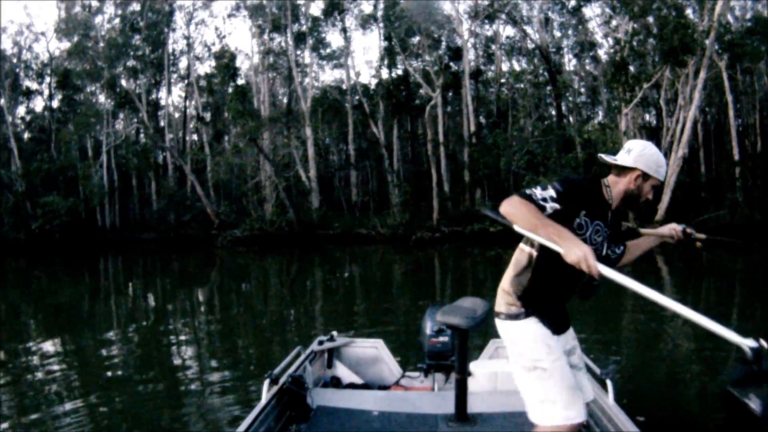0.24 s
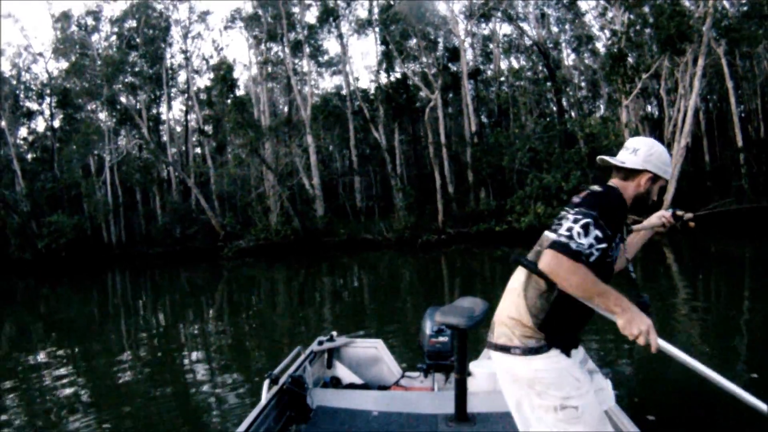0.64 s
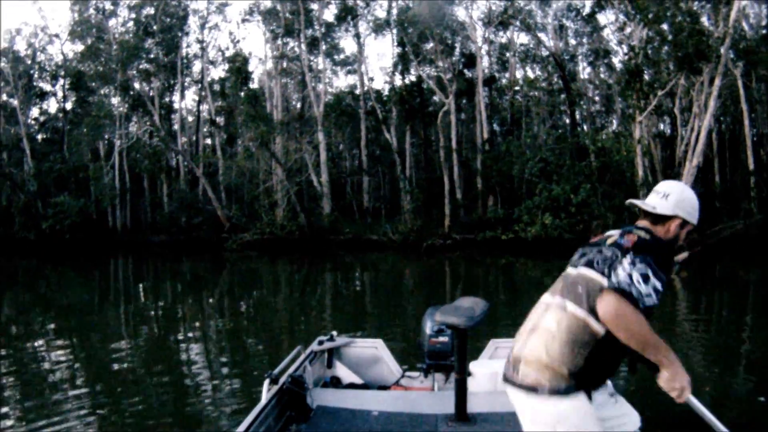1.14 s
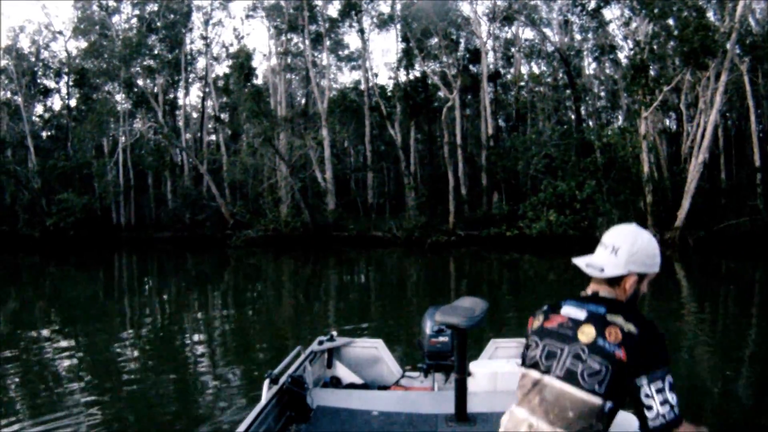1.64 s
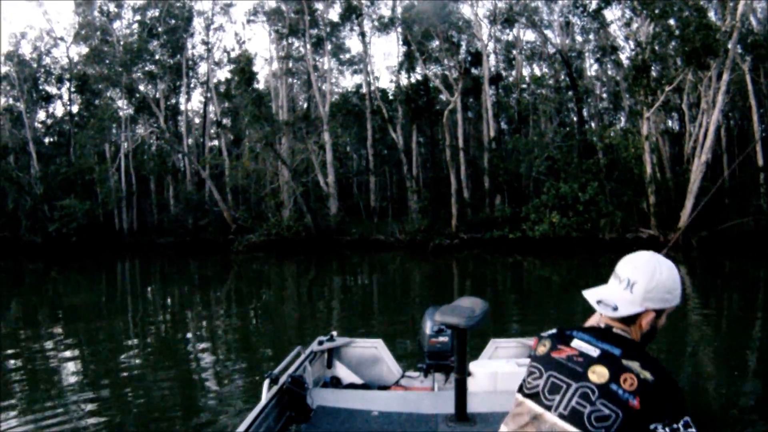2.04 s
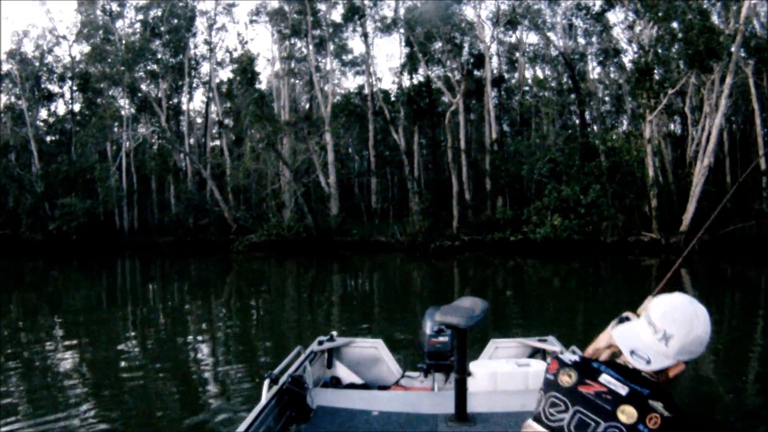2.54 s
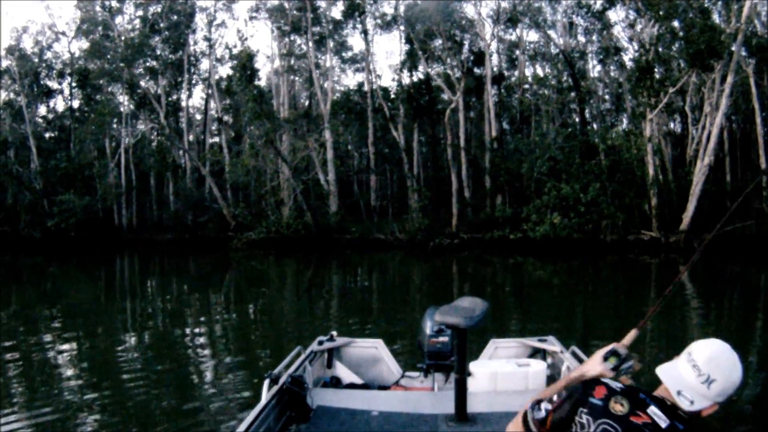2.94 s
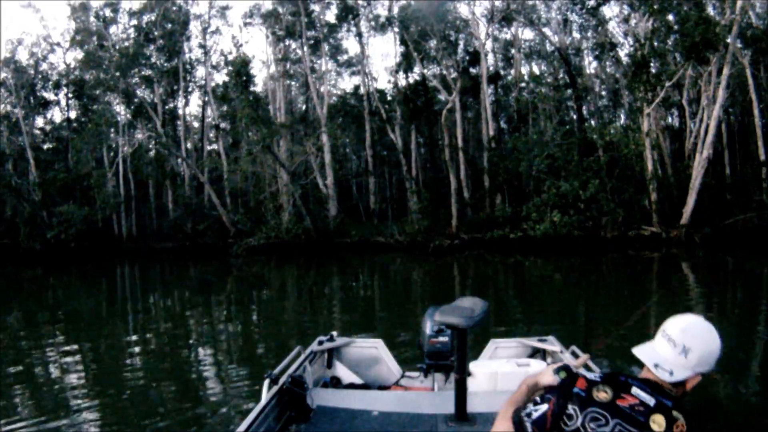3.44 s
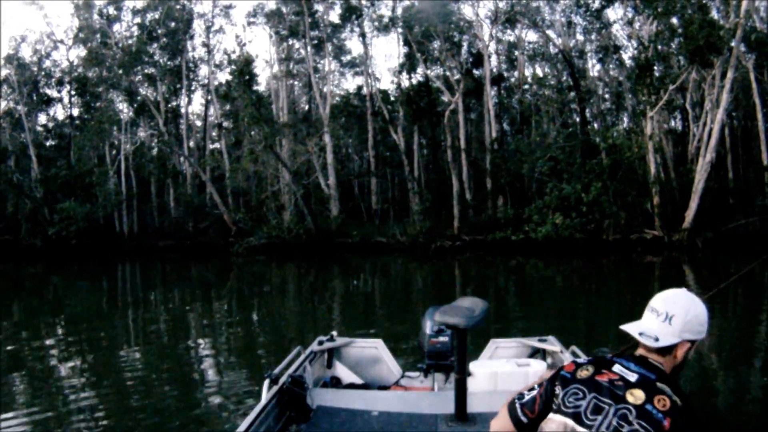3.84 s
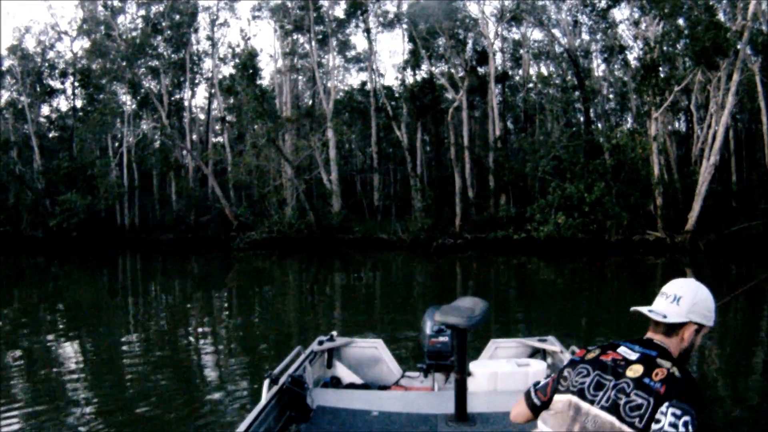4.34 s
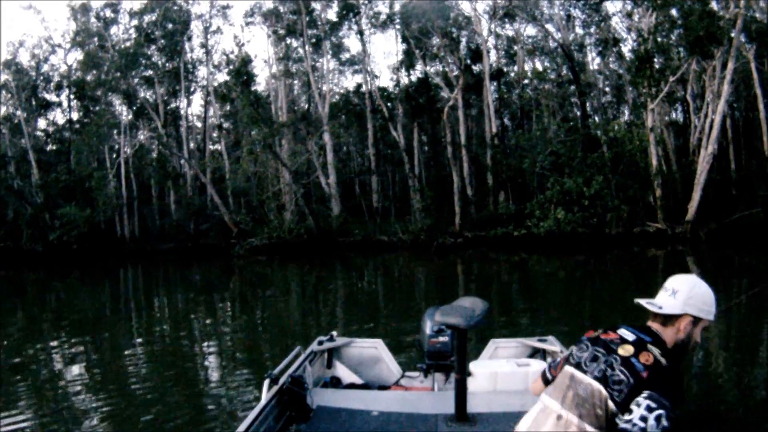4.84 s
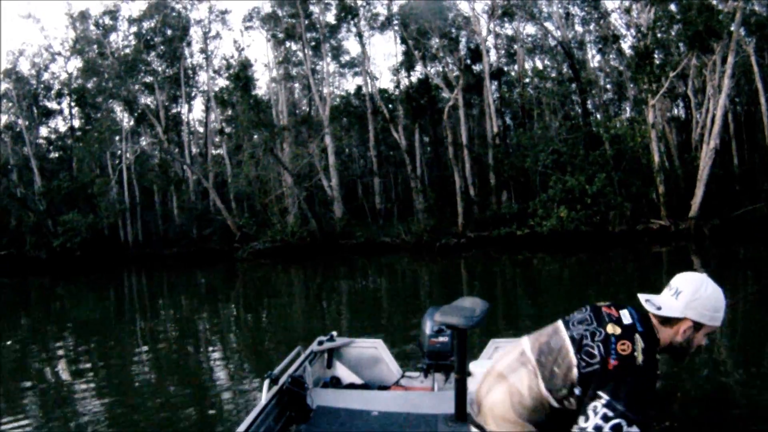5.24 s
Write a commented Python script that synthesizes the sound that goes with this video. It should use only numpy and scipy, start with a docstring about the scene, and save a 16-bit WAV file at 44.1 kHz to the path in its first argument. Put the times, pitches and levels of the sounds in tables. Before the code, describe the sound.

A small aluminium boat on a still river. Soft boomy footfalls and tiny metallic taps come first, with a heavier thud around 1.5 seconds. After a quiet stretch with faint squeaks, a hard knock rings the hull near 4 seconds, followed by low rumble, light scraping and an unsteady droning judder, strongest at the end. Close on-board microphone, mono, dry, with limited treble.

```python
"""On a quiet river, a small aluminium boat drifts while an angler steps about and leans over with a long pole.
Steps push on ringing hull modes and boom; gear taps ring the plating, and one hard knock rings through it.
Then the hull judders (an unsteady low drone) and scrapes (grainy friction on the plating), as if dragged
along a snag. Shaped noise makes the river, rumble and rustling; gliding tones make faint squeaks.
The sound is sampled at a low rate and each sample is held, which adds a glassy top."""
import sys
import numpy as np
from scipy import signal
from scipy.fft import rfft, irfft
from scipy.io import wavfile
from scipy.ndimage import uniform_filter1d

SR = 44100
rng = np.random.default_rng(int(sys.argv[2]) if len(sys.argv) > 2 else 0)


def generate_wav(sig):
    """Save sig (samples, or channels by samples) to the path in sys.argv[1] as 16-bit PCM at SR."""
    pcm = np.round(np.clip(np.atleast_2d(sig).T, -1, 1) * 32767).astype(np.int16)
    wavfile.write(sys.argv[1], SR, pcm)


N = 242550  # length in samples: 5.5 s


def from_db(db):
    """Turn decibels into a gain."""
    return 10 ** (np.asarray(db) / 20)


def rms_one(x):
    """Scale a sound to an rms (average strength) of 1."""
    return x / np.sqrt(np.mean(x ** 2) + 1e-20)


def noise(spectrum):
    """Noise of rms 1 whose spectrum runs smoothly through the table's points."""
    hz, level_db = np.transpose(spectrum)
    f = np.arange(N // 2 + 1) * SR / N + 1e-3  # the small offset avoids log(0)
    gain = from_db(np.interp(np.log(f), np.log(hz), level_db))
    gain = gain * np.minimum(f / hz[0], 1) ** 2  # fade out below the first point
    return rms_one(irfft(rfft(rng.standard_normal(N)) * gain, N))


def drift(rate):
    """A random wander: straight lines between random points, `rate` points per second."""
    knots = rng.standard_normal(N // 20)
    return np.interp(np.arange(N) / SR * rate, np.arange(len(knots)), knots)


def evened(x, span_s):
    """The same sound with its slow swells taken out, at about rms 1."""
    power = uniform_filter1d(x ** 2, max(int(span_s * SR), 2))
    return x / np.sqrt(np.abs(power) + 1e-12)


def band(x, low_hz, high_hz, order):
    edges = [low_hz, min(high_hz, 0.45 * SR)]
    return signal.sosfilt(signal.butter(order, edges, "band", fs=SR, output="sos"), x)


def ring(force, hz, t60):
    """One mode: each push starts a sine that dies by 60 dB in t60 seconds; a unit click gives height 1."""
    r = from_db(-60 / (t60 * SR))
    w = 2 * np.pi * hz / SR
    return signal.lfilter([0, np.sin(w)], [1, -2 * r * np.cos(w), r * r], force + 1e-18)


def clicks(times, sizes):
    """Single-sample blows at the given times."""
    return np.bincount(np.round(times * SR).astype(int), sizes, N)[:N]


def dying(force, t60):
    """A gain that jumps at each blow and dies by 60 dB in t60 seconds."""
    return signal.lfilter([1], [1, -from_db(-60 / (t60 * SR))], force + 1e-18)


def swell(peak_s, db, rise_db_per_s, fall_db_per_s):
    """A gain that climbs to its peak and falls away, each at a steady rate in dB."""
    t = np.arange(N) / SR - peak_s
    slope = np.where(t < 0, rise_db_per_s, fall_db_per_s)
    return from_db(db - np.abs(t * slope))


def strokes(rows, release_s):
    """The gain of rubbing movements: each eases in, holds, and lets go after its end time."""
    t = np.arange(N) / SR
    total = 0
    for start, end, attack, db in rows:
        rise = (t - start) / attack
        fall = 1 - (t - end) / release_s
        total = total + from_db(db) * np.sin(np.pi / 2 * np.clip(np.minimum(rise, fall), 0, 1)) ** 2
    return total


# colour of the still air over the water: f/Hz, relative level/dB (per Hz)
RIVER = [(11, -63), (18, -0.5), (44, 1.5), (75, -10.5), (103, -3), (166, -10), (221, -9.5), (339, -15),
         (430, -15), (473, -15.5), (559, -17), (820, -20), (2460, -26), (5400, -29.5), (7020, -36),
         (11900, -120)]
RIVER_DB = -57.5  # rms


def river():
    """The quiet river: steady noise with a fixed colour."""
    return from_db(RIVER_DB) * noise(RIVER)


# thin, dry clicks: t/s, level/dB
PINPRICKS = [(0.6095, -40), (2.2956, -43), (4.297, -44)]


def pinpricks():
    """Faint single-sample clicks: they spread across the whole treble and have no modes to ring."""
    s, db = np.transpose(PINPRICKS)
    return clicks(s, from_db(db))


# colour of the hull's rumble: f/Hz, relative level/dB (per Hz)
RUMBLE = [(14, -22), (25, -2.5), (34, 8.5), (43, -13), (54, 15), (66, -7), (77, 6.5), (86, -10.5),
          (105, -1), (125, -14), (145, -18), (250, -35.5), (1000, -96)]
# shifts of weight: peak t/s, level/dB (before level_db), settling/dB per s
SHIFTS = [(0.23, -46, 220), (0.45, -41, 80), (0.77, -41.5, 33), (1.7, -38, 52), (2.3, -54.5, 34),
          (2.76, -47.5, 150), (4.1, -39.5, 70), (4.48, -33.5, 47.5), (5.289, -33.5, 45)]
SHIFT_RISE_DB_PER_S, IDLE_RUMBLE_DB = 133, -64.5  # the idle level is also before level_db


def rocking(level_db):
    """Low rumble of the hull as weight shifts and water pushes on it; each shift swells and settles."""
    power = from_db(IDLE_RUMBLE_DB) ** 2
    for s, db, settling in SHIFTS:
        power = power + swell(s, db, SHIFT_RISE_DB_PER_S, settling) ** 2
    return from_db(level_db) * np.sqrt(power) * evened(noise(RUMBLE), span_s=0.21)


# colour of the rustling: f/Hz, relative level/dB (per Hz)
RUSTLE_COLOUR = [(800, -3), (1600, -17), (2100, 15.5), (2700, -6), (3350, 7), (4200, -28), (5100, 6),
                 (6000, -12)]
# movements that rustle clothes and gear: start t/s, end t/s, attack t/s, level/dB
RUSTLES = [(1.48, 2.0, 0.28, -67), (3.42, 4.6, 0.12, -72), (4.8, 5.35, 0.26, -68)]
RUSTLE_RELEASE_S = 0.17


def rustle(grain_db):
    """Faint rubbing of cloth and gear: noise whose level wanders quickly, which makes it grainy."""
    grainy = noise(RUSTLE_COLOUR) * from_db(grain_db * drift(90))
    return strokes(RUSTLES, RUSTLE_RELEASE_S) * rms_one(grainy)


# faint gliding squeaks: t/s, length t/s, start f/Hz, end f/Hz, level/dB
SQUEAKS = [(0.521, 0.037, 1385, 1316, -57.5), (0.824, 0.048, 1093, 776, -58.5),
           (2.757, 0.051, 2040, 1970, -64), (2.759, 0.079, 1233, 1360, -58.5),
           (2.777, 0.057, 2050, 2200, -62.5), (3.302, 0.037, 2070, 2620, -64),
           (3.463, 0.053, 1910, 2740, -68)]


def squeaks(waver):
    """Short tones that swell, glide and fade; `waver` is the unsteadiness as a share of the pitch."""
    out = np.zeros(N)
    for s, length, start_hz, end_hz, db in SQUEAKS:
        size, at = int(length * SR), round(s * SR)
        hz = np.geomspace(start_hz, end_hz, size) * (1 + waver * drift(315)[:size])
        tone = np.sin(2 * np.pi * np.cumsum(hz) / SR)
        out[at:at + size] += from_db(db) * np.hanning(size) * tone
    return out


# modes of the plating, rung by the scraping and the knocks: f/Hz, relative level/dB, t60 t/s
PLATING = [(316, -19, .36), (352, -15, .32), (443, -14, .32), (524, -11, .23), (573, -8, .2),
           (620, -22, .3), (678, -13, .26), (740, -26, .22), (800, -27, .3), (850, -25, .2),
           (968, -21, .16), (1012, -14, .3), (1055, -11, .24), (1097, 4.5, .18), (1142, 3, .17),
           (1174, 0, .17), (1228, -4, .2), (1327, 2.5, .14), (1375, -11, .19), (1416, -16, .2),
           (1787, -25, .18), (1938, -23, .18), (2067, -19, .12), (2160, -6, .12), (2213, -1, .1),
           (2262, -13, .14), (2471, -22, .13)]
# body of the scraping: f/Hz, relative level/dB (per Hz)
SCRAPE_COLOUR = [(200, -17), (320, 9.5), (450, -11.5), (610, 7), (700, -9), (800, 2.5), (920, -10),
                 (1150, 4), (1380, -22.5), (1550, -22), (2050, -4), (2700, -19.5), (5000, -46)]
# the plating slides along the snag: start t/s, end t/s, attack t/s, level/dB (before level_db)
SCRAPES = [(4.1, 4.68, 0.037, -67.5), (4.92, 5.5, 0.48, -56)]
SCRAPE_RELEASE_S = 0.19


def scrape(level_db, grain_db, contrast, body_db):
    """Grainy friction keeps the plating's modes ringing; `contrast` stretches their level differences."""
    grip = from_db(grain_db * drift(70))
    force = rng.standard_normal(N) * grip
    modes = 0
    for k, (hz, db, t60) in enumerate(PLATING):
        modes = modes + (-1) ** k * from_db(db * contrast) * ring(force, hz, t60)
    body = from_db(body_db) * rms_one(noise(SCRAPE_COLOUR) * grip)
    return from_db(level_db) * strokes(SCRAPES, SCRAPE_RELEASE_S) * (rms_one(modes) + body)


# tones of the judder: multiple of the slip rate, relative level/dB; 1.5 makes alternate slips differ
JUDDER_ORDERS = [(1, 3), (1.5, -37), (2, -30), (3, -42.5)]
# surges of the dragged hull: peak t/s, level/dB (before level_db), rise/dB per s, fall/dB per s,
# slip rate f/Hz
SURGES = [(4.477, -29, 60, 209, 110), (4.681, -34.5, 68.5, 89, 108.5), (5.04, -39.5, 231, 170, 104),
          (5.301, -28, 138, 228, 101), (5.379, -26.5, 298.5, 53, 110)]


def judder(level_db, rough_db, jitter):
    """The hull sticks and slips: an unsteady low drone, its pace led by the strongest surge."""
    power = np.array([swell(s, db, rise, fall) for s, db, rise, fall, _ in SURGES]) ** 2 + 1e-20
    total_power = power.sum(axis=0)
    slips_hz = np.array(SURGES)[:, -1] @ power / total_power  # average weighted by power
    phase = 2 * np.pi * np.cumsum(slips_hz * (1 + jitter * drift(40))) / SR
    tone = sum(from_db(db) * np.sin(multiple * phase) for multiple, db in JUDDER_ORDERS)
    roughness = from_db(level_db + rough_db * drift(45))
    return np.sqrt(2 * total_power) * tone * roughness


# heavy, soft blows on the deck: t/s, level/dB (of the push), length of the push t/s
THUDS = [(0.204, -51, 0.0022), (0.31, -39.5, 0.015), (0.346, -32.5, 0.018), (0.404, -49, 0.013),
         (0.578, -44.5, 0.0016), (0.703, -50, 0.0071), (1.133, -45.5, 0.0095), (1.555, -26, 0.016),
         (1.941, -52, 0.0012), (2.678, -50, 0.012), (3.974, -32.5, 0.0031), (4.021, -29, 0.01),
         (4.069, -45, 0.0075), (4.177, -61, 0.0033)]
# low modes of the hull: f/Hz, relative level/dB, t60 t/s
HULL = [(32, -28, 0.35), (43.27, -2, 0.87), (54.02, 8, 0.68), (68.4, -2, 0.72), (75.1, -1, 0.51),
        (91.3, -10.5, 0.85), (108.3, 2.5, 0.79), (135.5, -8.5, 0.51)]


def thuds():
    """Soft pushes boom the hull; neighbouring modes start opposed, so the boom swells and then beats."""
    t = np.arange(N) / SR
    force = 0
    for s, db, push in THUDS:
        shape = np.sin(np.pi * np.clip((t - s) / push, 0, 1)) ** 2
        force = force + from_db(db) * shape * 2 / (push * SR)  # a longer push is no stronger in total
    return sum((-1) ** k * from_db(db) * ring(force, hz, t60) for k, (hz, db, t60) in enumerate(HULL))


# colour of the dense wash of weaker plating modes: f/Hz, relative level/dB (per Hz)
WASH = [(200, -26), (290, -25), (350, -15), (600, -3), (850, -11.5), (1250, 1), (1400, 0.5), (1500, -29),
        (2200, -2), (2650, -24), (4200, -32.5), (6000, -35)]
# hard contacts on the plating, also played by ticks():
# t/s, ring level/dB, brightness/dB per octave, tick peak level/dB, tick f/Hz, tick t60 t/s
KNOCKS = [(0.069, -79, 9, -53, 1204, 0.26), (0.292, -73.5, -10, -52.5, 1070, 0.038),
          (0.4523, -63.5, -3, -47.5, 1900, 0.01), (0.4817, -64.5, -8.5, -44, 1900, 0.012),
          (0.724, -70, -1, -65, 1070, 0.074), (0.82, -65.5, -8, -55.5, 1220, 0.069),
          (1.3853, -84, 12, -50.5, 2040, 0.021), (1.747, -77, 9, -52, 2120, 0.031),
          (1.7768, -90, 0, -45, 5550, 0.017), (1.862, -87, 5, -57, 5000, .025),
          (1.983, -82, 20, -51, 2100, 0.047), (1.996, -86, 10, -53.5, 3350, .04),
          (3.622, -79, 16, -56, 3080, 0.044), (3.97293, -40.5, 8, -32, 2200, .035),
          (3.97452, -36.3, 15, -40, 5300, .04), (3.97723, -30.3, -5, -36, 1220, .08),
          (3.99708, -46.5, 13, -44, 5300, .035), (4.0172, -49.5, -1, -55, 4500, .04),
          (4.366, -77, 23, -54, 2820, 0.042), (4.6573, -73, -11, -46.5, 1120, 0.037),
          (4.925, -77.5, 19.5, -58, 2630, 0.036), (5.0983, -80, 21, -53.5, 2100, 0.024),
          (5.2457, -60.5, 2, -51, 1090, 0.046), (5.3408, -70.5, -12, -51.5, 2070, 0.034)]


def knocks(spread_db, wash_db, wash_t60, low_hz, high_hz):
    """Every contact rings all the plating's modes, tilted towards high or low by its own brightness."""
    s, ring_db, bright = np.transpose(KNOCKS)[:3]
    chance = rng.standard_normal((len(s), len(PLATING)))
    modes = 0
    for k, (hz, db, t60) in enumerate(PLATING):
        tilt_db = bright * np.log2(hz / 1100)
        sizes = from_db(ring_db + db + tilt_db + spread_db * chance[:, k])
        modes = modes + ring(clicks(s, sizes), hz, t60)
    wash = from_db(wash_db) * noise(WASH) * dying(clicks(s, from_db(ring_db)), wash_t60)
    # a contact lasts a moment, which rounds off the top; thin plates radiate little bass
    return band(modes, low_hz, high_hz, order=8) + wash


def ticks(half_octaves):
    """The dry crack of each contact: brief chatter in the touching piece's own resonance."""
    out = np.zeros(N)
    t = np.arange(SR // 4) / SR
    width = 2 ** half_octaves
    for s, _, _, db, hz, t60 in KNOCKS:
        raw = rng.standard_normal(len(t) + SR // 50)
        chatter = band(raw, hz / width, hz * width, order=3)[-len(t):]  # skip the filter's start-up
        envelope = from_db(-60 * t / t60) * (1 - np.exp(-t * hz / 2))
        crack = evened(chatter, span_s=0.004) * envelope
        at = round(s * SR)
        out[at:at + len(t)] += (from_db(db) * crack / np.abs(crack).max())[:N - at]
    return out


def scene():
    """The quiet river, small movements in the boat, then the dragging and the blows."""
    moving = rocking(level_db=2.0) + rustle(grain_db=4.5) + squeaks(waver=0.035)
    drag = scrape(level_db=-1.5, grain_db=1.0, contrast=1.25, body_db=3.0)
    drag = drag + judder(level_db=-2.5, rough_db=4.5, jitter=0.0141)
    plating = knocks(spread_db=0.3, wash_db=-1.5, wash_t60=0.12, low_hz=285, high_hz=2400)
    blows = thuds() + plating + ticks(half_octaves=0.18)
    return (river() + moving + drag + blows)[None]


HOLD_HZ, CUTOFF_HZ = 12000, 15200  # slow sampling rate, top of the final sound


def record(dry):
    """Slow samples, each held: the steps mirror the sound faintly on both sides of the sampling rate."""
    smooth = signal.sosfilt(signal.butter(7, 5550, fs=SR, output="sos"), dry)
    slow = signal.resample_poly(smooth, HOLD_HZ, SR, axis=1)
    held = np.repeat(slow, 8, axis=1)  # eight equal points draw each flat step
    steps = signal.resample_poly(held, SR, 8 * HOLD_HZ, axis=1)[:, :N]
    # the pinpricks join after the holding, so they keep their full treble up to the cutoff
    top_cut = signal.ellip(10, 0.2, 80, CUTOFF_HZ, fs=SR, output="sos")
    return signal.sosfilt(top_cut, steps + pinpricks())


dry = scene()
out = record(dry)
generate_wav(out)
```